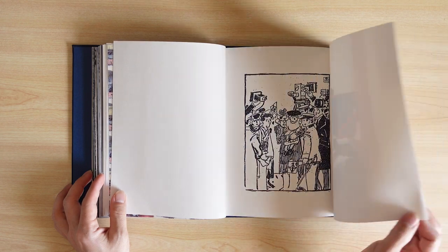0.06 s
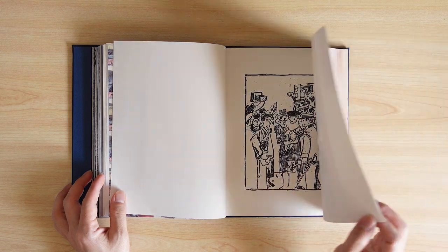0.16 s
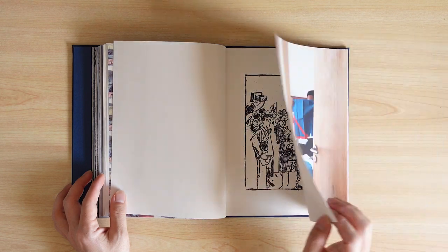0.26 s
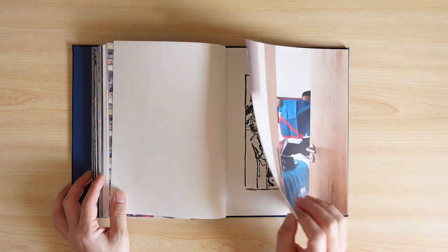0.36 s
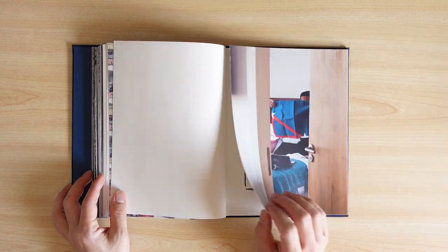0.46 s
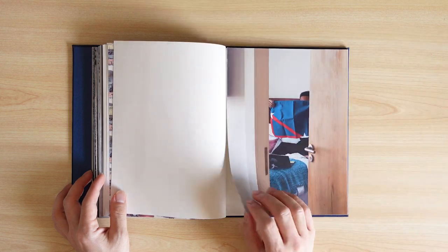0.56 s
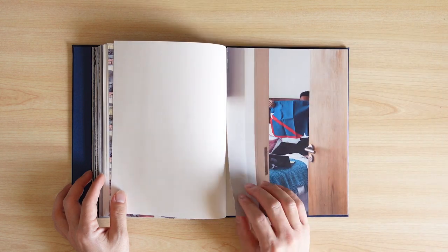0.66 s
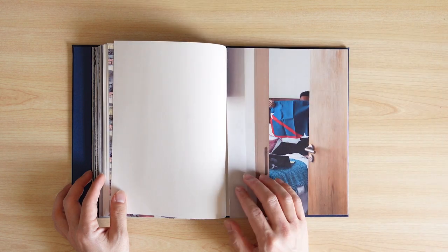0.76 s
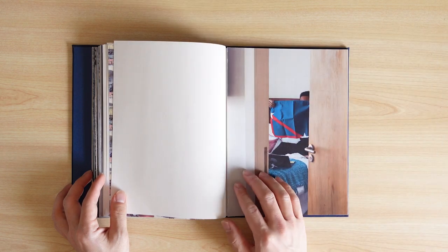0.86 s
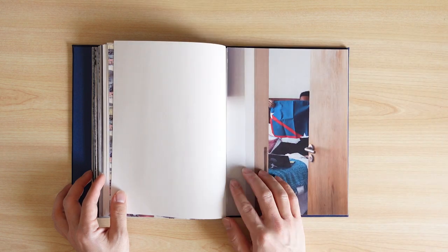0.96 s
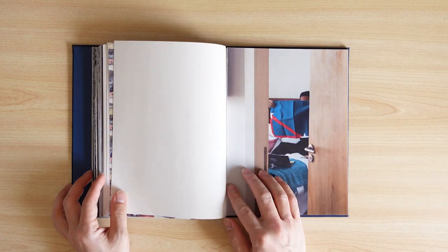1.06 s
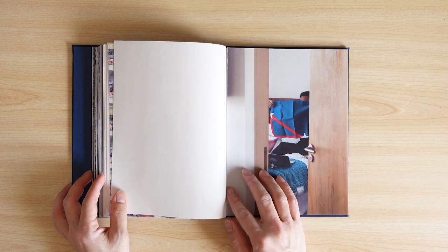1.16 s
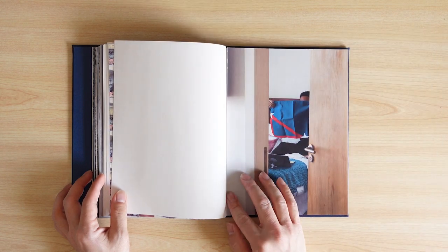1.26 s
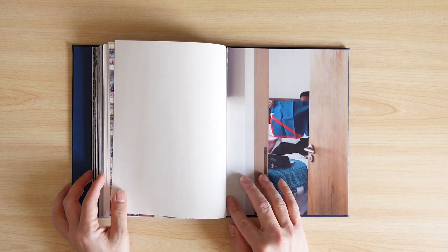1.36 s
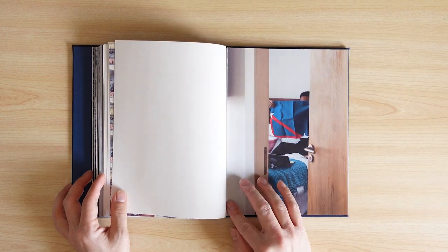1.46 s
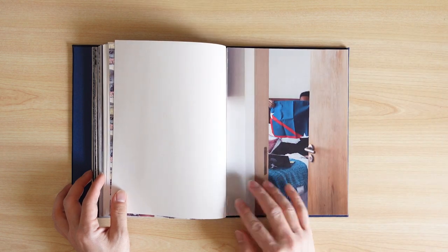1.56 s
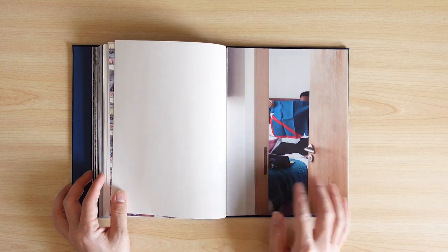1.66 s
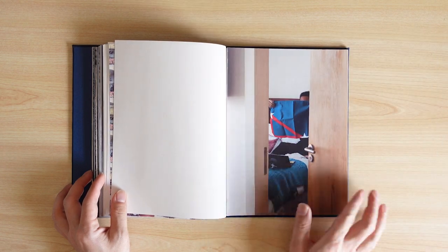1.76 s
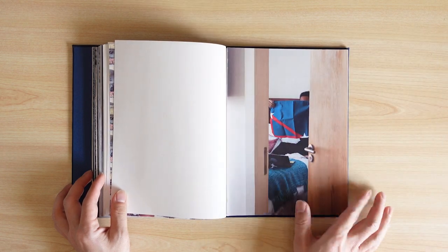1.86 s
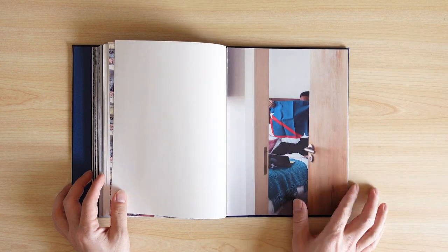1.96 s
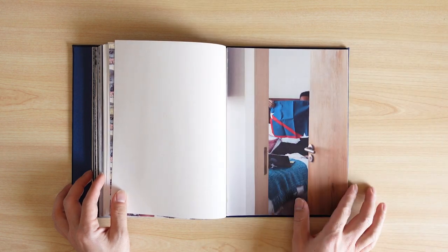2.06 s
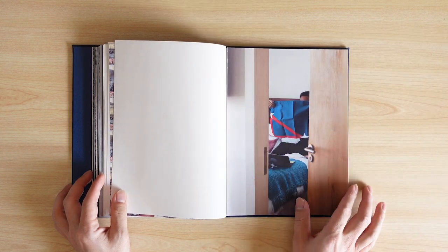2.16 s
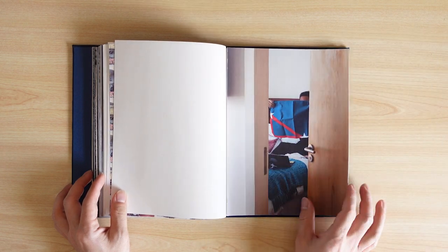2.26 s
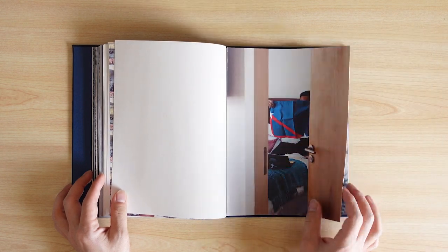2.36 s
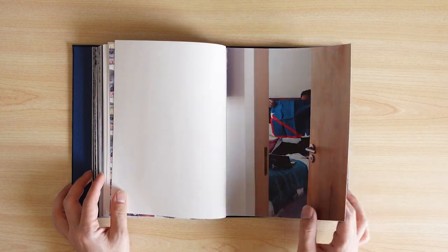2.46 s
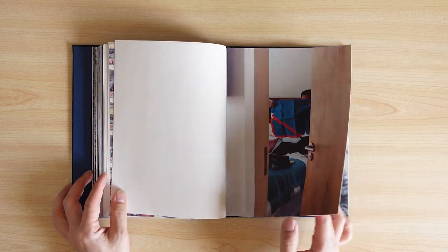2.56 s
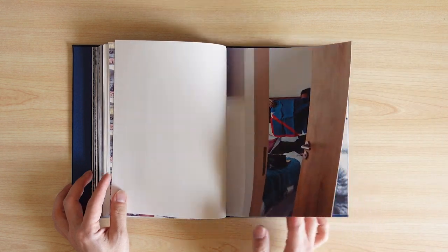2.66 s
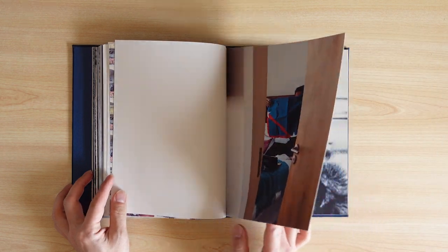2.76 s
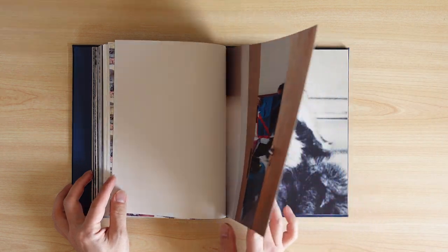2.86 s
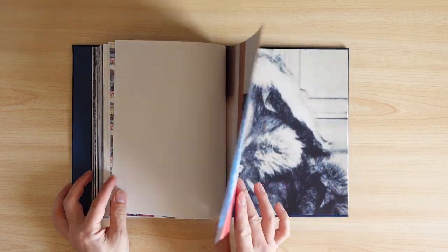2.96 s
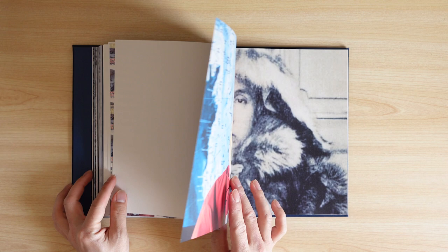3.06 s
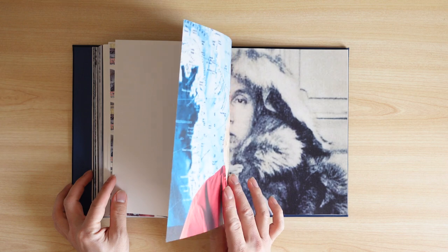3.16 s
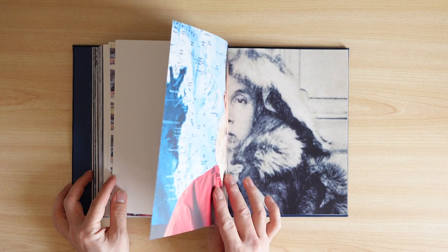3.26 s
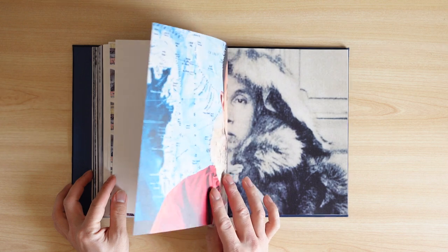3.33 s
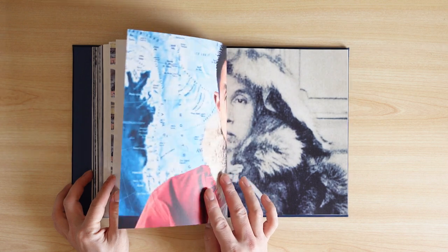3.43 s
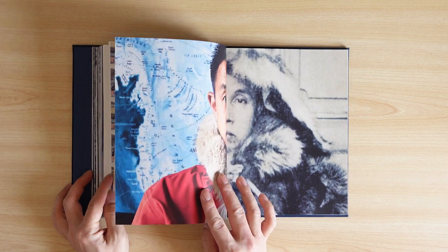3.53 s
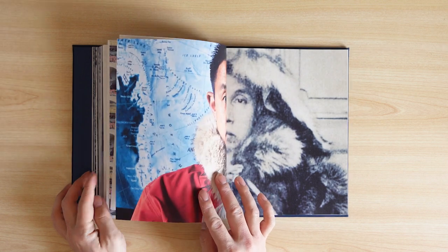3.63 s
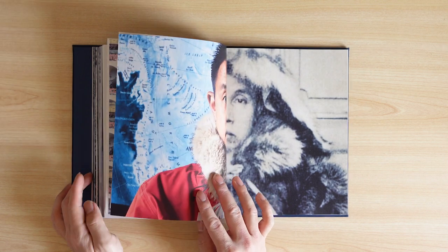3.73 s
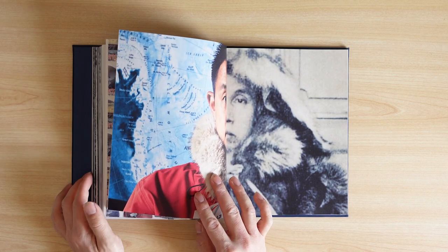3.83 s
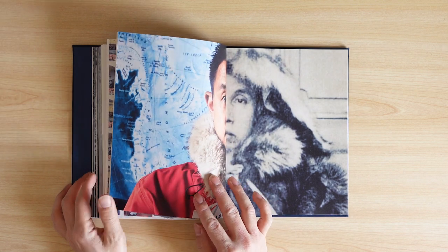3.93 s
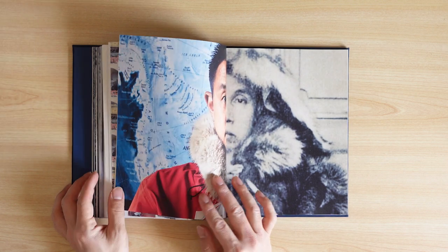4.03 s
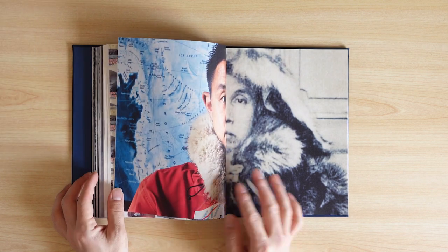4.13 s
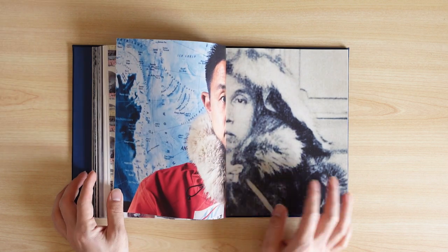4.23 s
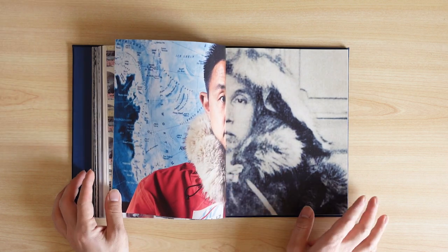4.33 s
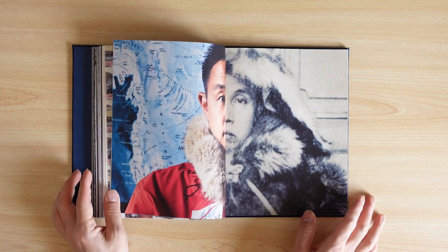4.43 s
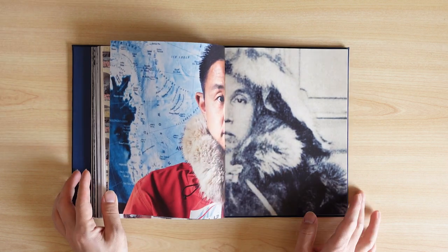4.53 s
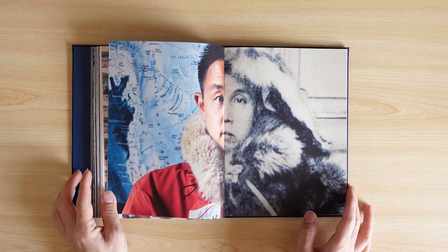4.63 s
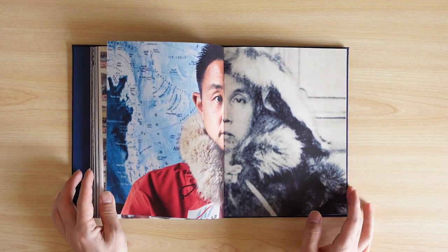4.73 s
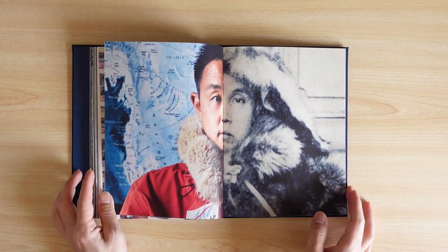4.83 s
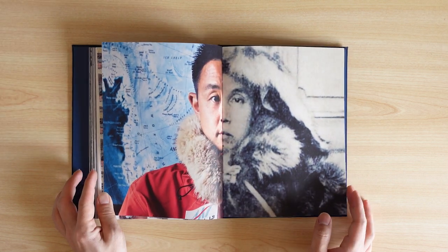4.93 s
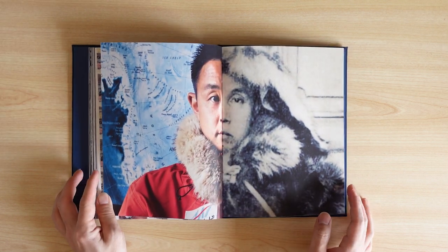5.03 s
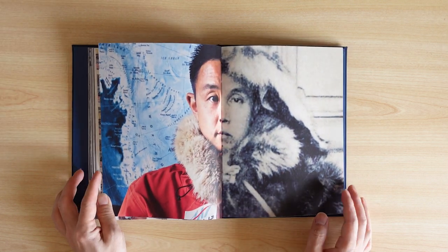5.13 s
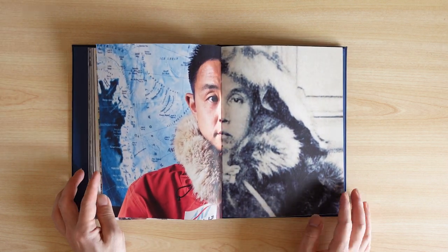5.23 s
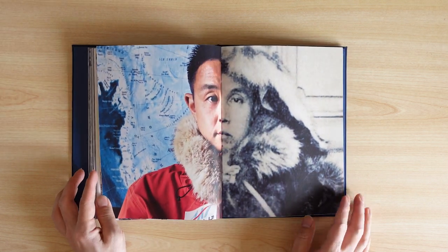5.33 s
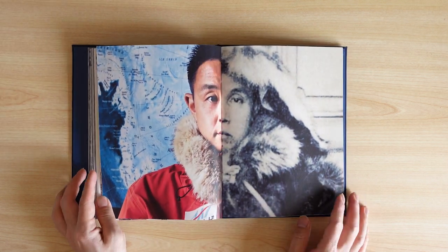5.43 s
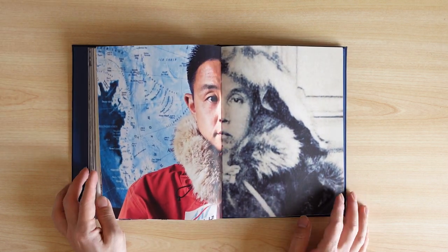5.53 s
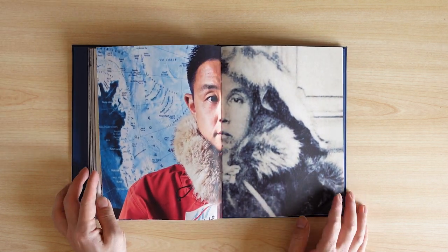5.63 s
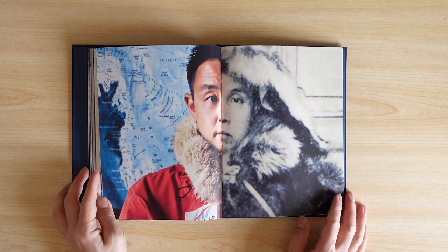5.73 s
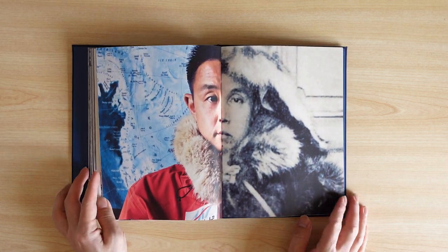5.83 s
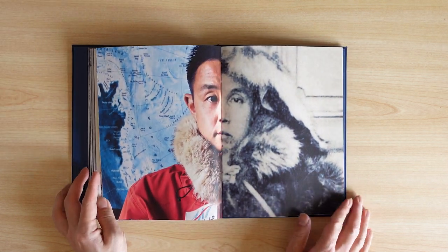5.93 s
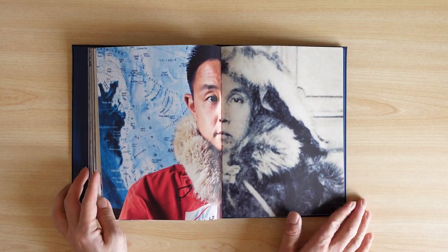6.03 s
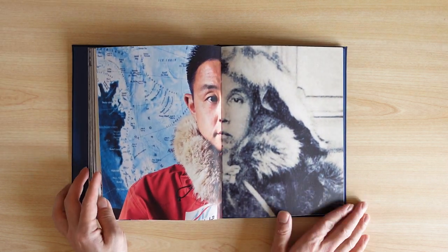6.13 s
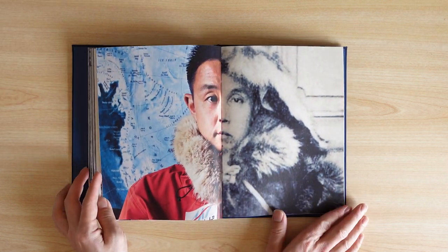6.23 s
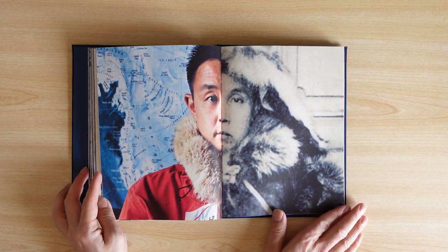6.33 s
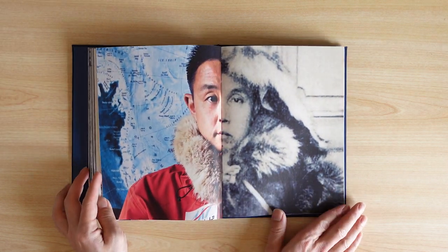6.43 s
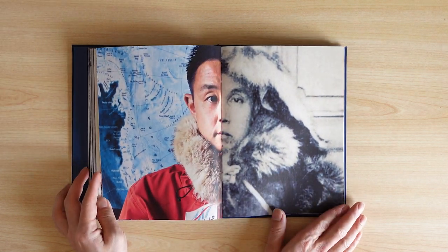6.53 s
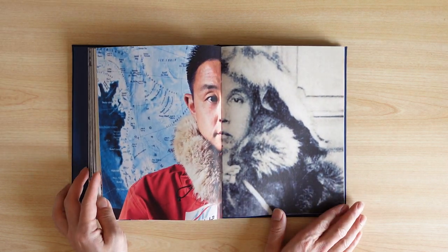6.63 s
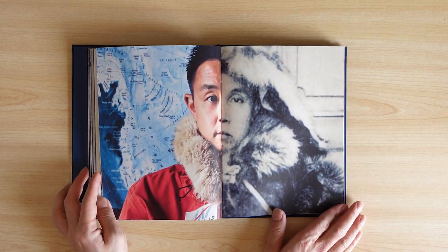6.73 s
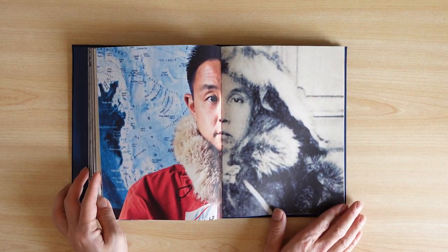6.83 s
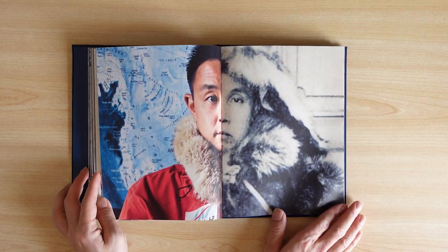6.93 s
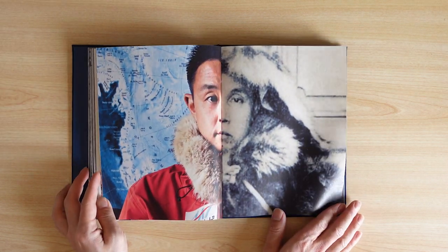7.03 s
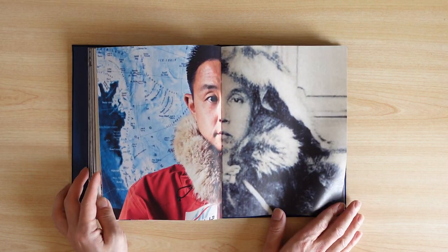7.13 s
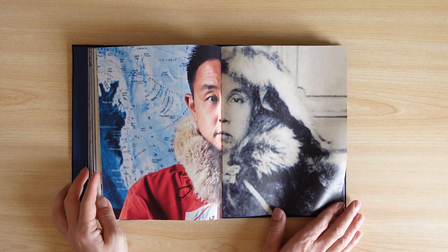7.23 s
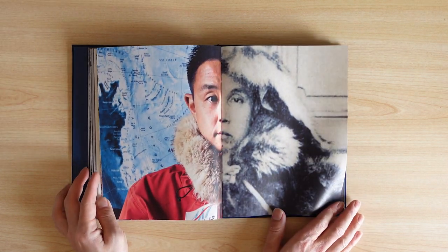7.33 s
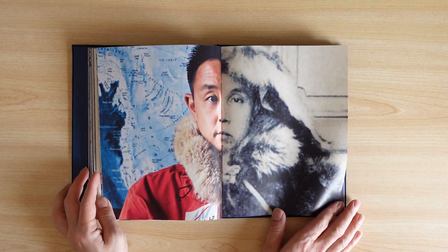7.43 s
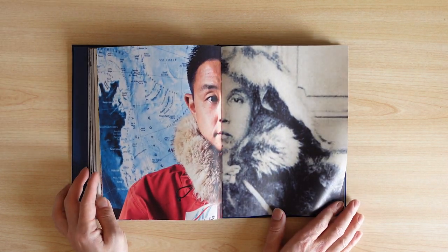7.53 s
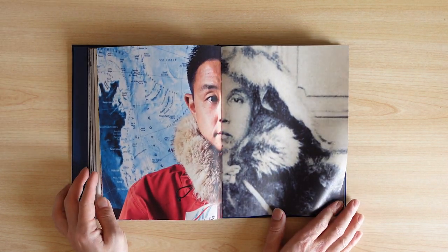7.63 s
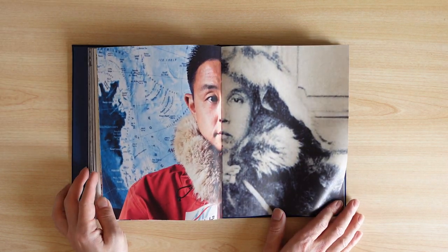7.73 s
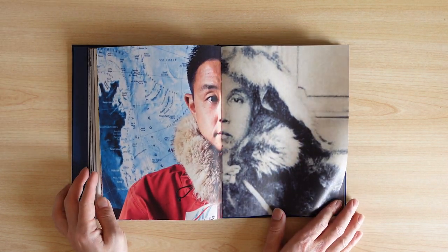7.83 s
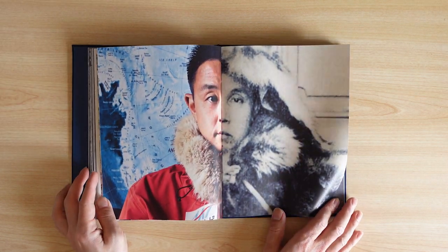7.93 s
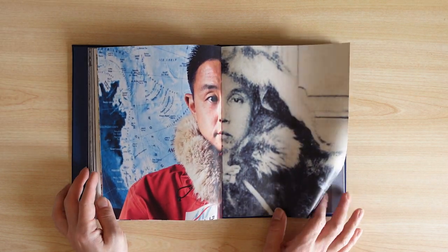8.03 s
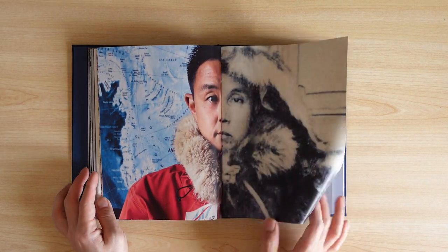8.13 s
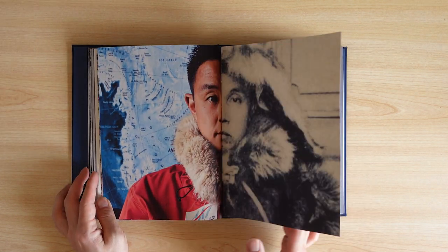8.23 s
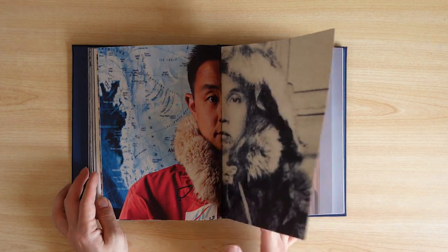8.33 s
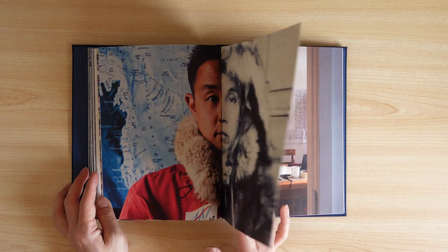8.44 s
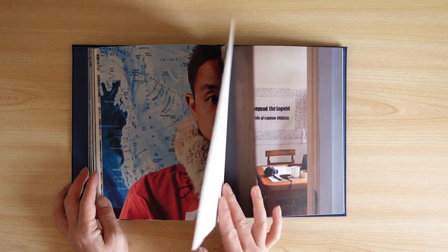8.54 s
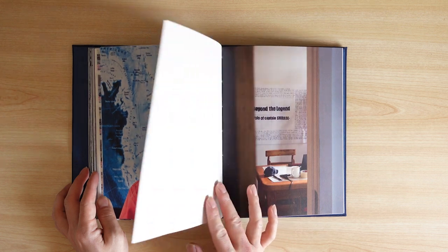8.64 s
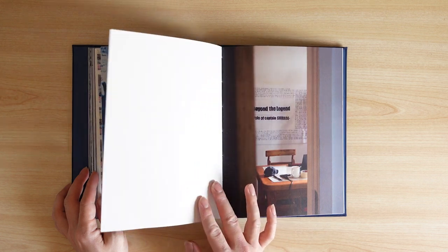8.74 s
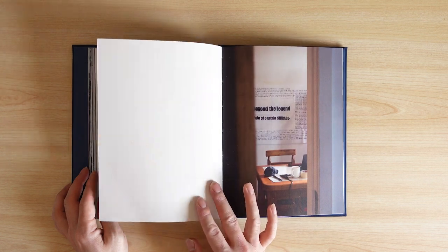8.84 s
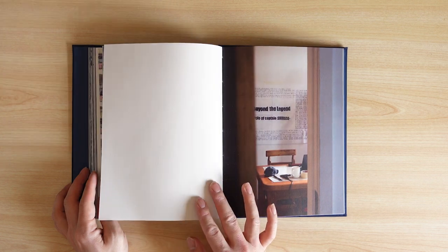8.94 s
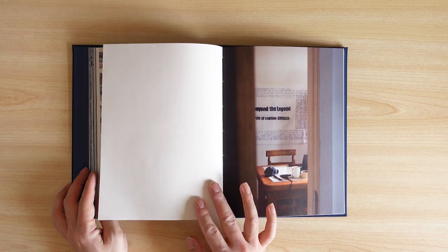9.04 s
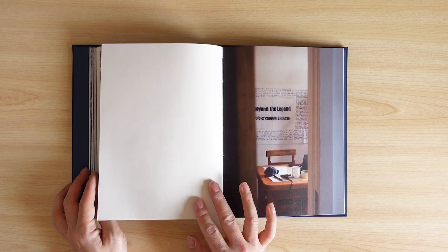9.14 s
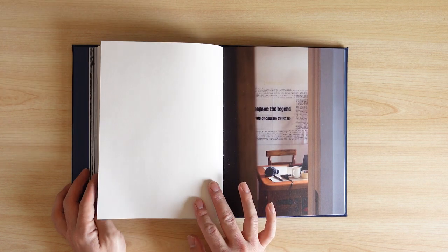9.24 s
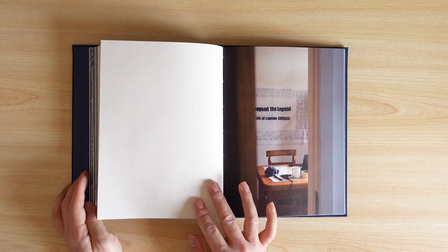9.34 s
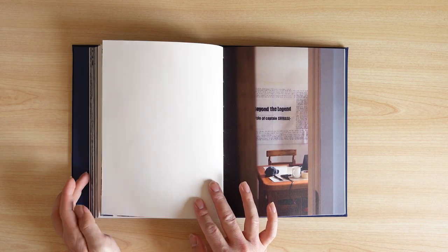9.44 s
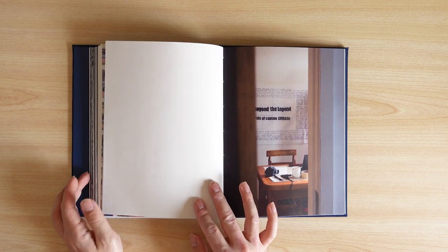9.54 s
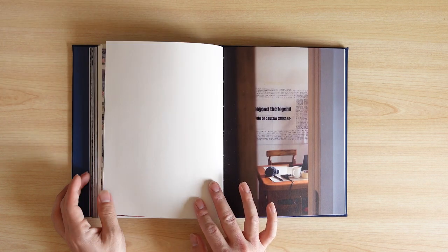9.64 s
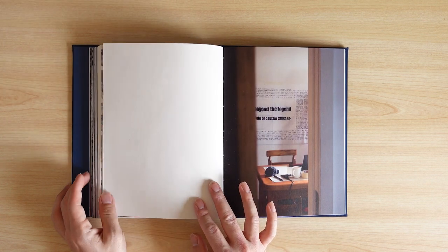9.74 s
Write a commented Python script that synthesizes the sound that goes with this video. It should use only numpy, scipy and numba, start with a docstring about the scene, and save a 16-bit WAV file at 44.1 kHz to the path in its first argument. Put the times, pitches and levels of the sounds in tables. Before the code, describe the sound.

Soft paper slides, ticks and light table knocks as a hardcover book is leafed through, with one loud page flap near the end.

```python
"""Turning the pages of a hardcover book

A quiet room, a book on a wooden table, a stereo pair of microphones close in front of it.
Skin and paper edges slide over stiff glossy sheets, whose fibres catch and let go in a hiss.
Small snaps tick, book and hands knock on the table, a fingertip creaks, and late on one page buckles
with a loud flap. A faint airy hum with one narrow whistle lies below."""
import sys
import numpy as np
from scipy import signal
from scipy.io import wavfile
from numba import njit

SR = 44100
rng = np.random.default_rng(int(sys.argv[2]) if len(sys.argv) > 2 else 0)


def unload_wav(signal):
    """Save mono or channel-first audio to the path in sys.argv[1] as 16-bit WAV at rate SR, clipped to [-1, 1]."""
    wavfile.write(
        sys.argv[1],
        SR,
        np.round(np.clip(np.atleast_2d(signal).T, -1, 1) * 32767).astype(np.int16),
    )


N = 431734

# spectrum of the room tone: frequency_hz, relative_density_db
AIR_SPECTRUM = [(18, -70), (30, -38), (161, -8.5), (499, -4), (540, -5.5), (801, -3), (988, -23.5),
                (1220, -2.5), (1590, -8), (4530, -17), (16000, -27)]
# how alike the room tone is at the two microphones: frequency_hz, correlation
AIR_LIKENESS = [(60, 0.49), (240, 0.1), (950, -0.15), (3770, -0.32), (15000, 0.67)]
# small snaps of paper: start_s, level_db, pitch_hz, crack_db (relative to level_db)
PAPER_SNAPS = [(0.038, -47.5, 1040, -9), (0.109, -48, 1120, 0), (0.133, -37.5, 950, -2),
               (0.387, -56, 1450, -5), (0.488, -54, 1490, -9), (0.704, -51, 1070, 0), (0.82, -57, 3600, 4),
               (1.05, -56, 1680, -23), (2.768, -50, 1060, 1), (2.831, -59.5, 1150, -25),
               (2.845, -60, 1150, 2), (3.015, -63, 1260, 9), (4.086, -52.5, 1410, -2),
               (4.407, -56, 1090, -4), (4.559, -55, 1470, -6), (4.787, -49.5, 1340, -16),
               (4.922, -51.5, 1470, -0.5), (5.251, -59, 1190, -4), (5.281, -42, 1090, -14),
               (5.49, -51, 1150, -15), (5.504, -45, 1040, -9), (5.618, -53.5, 950, -19),
               (5.681, -54, 1210, -1), (5.706, -60, 1210, -2), (5.753, -66, 1330, 7), (5.871, -54, 1030, 2),
               (6.659, -48.5, 1170, -18), (6.693, -50.5, 1160, -23), (6.785, -44.5, 1200, -7.5),
               (6.799, -47, 1130, -17), (6.821, -47, 1170, -18), (7.25, -59, 1980, 2),
               (7.622, -57.5, 1970, -18), (7.754, -56, 2020, -19), (7.85, -67, 1230, -1),
               (8.146, -41, 2100, 4), (8.226, -38, 2840, -6), (8.24, -42, 2480, 12), (9.469, -58, 1100, 3),
               (9.516, -57, 732, -3), (9.725, -61, 1240, 8)]
# strokes over the paper: full_strength_s, rise_s, hold_s, fall_s, friction_db,
# body_db, sheen_db, contact_db (these three relative to friction_db), contact_hz, body_hz
PAPER_STROKES = [ (0.11, 0.0043, 0.025, 0.033, -53.5, 3.5, -10, -3, 3520, 1130),
                 (0.135, 0.017, 0.022, 0.12, -48, -1, -10.5, -1, 3530, 1130),
                 (0.198, .05, .02, 0.11, -51.5, -3.5, -10.5, -10, 3500, 1450),
                 (0.281, 0.025, 0.025, 0.069, -50, -5, -12, -8, 3500, 1530),
                 (0.384, 0.0081, 0.052, 0.054, -55.5, -5, -18, -5.5, 2950, 1520),
                 (0.494, 0.02, 0.012, 0.11, -55.5, -7, -16, -6, 2920, 1490),
                 (0.71, 0.026, 0.015, 0.077, -52.5, -18, -24, -1, 3650, 1050),
                 (0.773, 0.065, 0.057, 0.025, -58.5, -20, -8, 1, 3660, 1050),
                 (0.894, 0.15, 0.061, 0.18, -73.5, -9, -1, -7, 3630, 1210),
                 (1.048, .025, 0.018, 0.064, -70, 4.5, -2, -5, 2800, 1210),
                 (1.269, 0.19, 0.06, .2, -60, -9.5, -4, -14, 4900, 1380),
                 (1.418, .15, .08, 0.17, -60, -10, -5.5, -10, 4200, 1380),
                 (1.655, .1, 0.032, 0.24, -74, 1, 1.5, -11, 3600, 1200),
                 (2.346, 0.14, .02, 0.051, -70, -20, 5.5, -11, 4900, 1120),
                 (2.439, 0.036, 0.012, 0.19, -53, -4, -6, -7, 3080, 995),
                 (2.664, .12, .05, .1, -57, -3.5, -2.5, -8, 3540, 890),
                 (2.751, 0.093, 0.0097, .12, -53, 2, -4, -6.5, 3060, 1070),
                 (2.873, 0.32, 0.1, 0.19, -66.5, -5.5, 4.5, -13, 2900, 1170),
                 (3.124, 0.26, 0.27, .2, -75.5, -5, -3, 0, 4580, 1000),
                 (3.519, .05, 0.016, 0.22, -59, -0.5, -8, -9, 4320, 1230),
                 (3.632, 0.077, 0.051, 0.087, -57.5, -9.5, -24, -10, 4560, 1270),
                 (3.791, .15, 0.078, 0.065, -51, -6, -15, -5.5, 4400, 950),
                 (3.94, .1, 0.051, 0.13, -66.5, -2, -11, -1.5, 4200, 1170),
                 (4.081, 0.017, 0.008, 0.16, -61, -2, -11, -2.5, 4040, 1260),
                 (4.24, .06, 0.016, 0.18, -69.5, 0, -8, -7, 4100, 1210),
                 (4.403, 0.013, 0.013, 0.16, -66.5, 1, -9, -7, 4470, 1180),
                 (4.574, 0.12, 0.092, .3, -73.5, 8.5, 2, -1, 4270, 1220),
                 (4.916, .015, 0.0074, 0.12, -67, 6, -2.5, -12, 3270, 1240),
                 (5.105, 0.23, 0.073, 0.2, -79, 12, -12, -13, 3380, 1110),
                 (5.301, 0.033, 0.058, 0.083, -51, -1.5, -14.5, -5, 4400, 1120),
                 (5.508, 0.023, 0.0095, 0.085, -61.5, 4.5, -11, -3, 4300, 1230),
                 (5.681, 0.0072, 0.016, 0.045, -64, 1.5, -19, -2, 4600, 1220),
                 (5.759, 0.025, 0.025, 0.062, -68.5, 2.5, -12, -4, 4230, 1210),
                 (5.871, 0.0083, 0.0046, 0.037, -63.5, -5, -8, -7, 4300, 1140),
                 (6.26, 0.064, .02, 0.12, -79, -4.5, 4, -8, 3960, 1160),
                 (6.532, .12, 0.092, 0.12, -79.5, 1, -23, -6, 2800, 1140),
                 (6.784, 0.012, 0.031, .06, -73.5, 1, -6, -5, 2900, 1160),
                 (7.046, 0.048, 0.031, 0.072, -57, -9.5, -10.5, -7, 3800, 1210),
                 (7.132, 0.071, 0.023, 0.088, -62.5, -9, -8, -1.5, 2800, 1240),
                 (7.312, 0.14, 0.028, .08, -69.5, -6, -18, 3, 2630, 1210),
                 (7.453, .05, .01, 0.064, -72, 1, -15, -6, 2860, 1200),
                 (7.554, 0.027, 0.015, 0.053, -71, 3, -25, -1.5, 2880, 1230),
                 (7.627, 0.023, 0.015, .1, -70.5, 1, -19, -3, 2880, 1300),
                 (7.755, 0.02, 0.0079, 0.037, -63.5, -4, -12, -4, 2880, 1260),
                 (7.846, 0.019, 0.022, .15, -67.5, -2.5, -25, -3, 2850, 1290),
                 (7.977, 0.058, 0.045, .1, -53.5, -11, -10.5, -12, 2800, 1950),
                 (8.069, 0.088, 0.095, 0.078, -49, -8.5, -0.5, -8, 3900, 1960),
                 (8.233, 0.024, 0.014, 0.018, -37, -6, 0, -3, 3200, 1890),
                 (8.251, 0.01, 0.024, 0.054, -39.5, 10, -5, -5.5, 2860, 1090),
                 (8.319, .05, 0.046, 0.19, -52, -12, 3.5, -11, 3500, 834),
                 (8.494, 0.092, 0.028, 0.086, -53.5, -11, 0, -11, 5740, 895),
                 (8.604, .1, 0.017, 0.2, -59.5, -3, -5, -10, 5800, 990),
                 (8.913, 0.062, 0.03, 0.16, -71.5, 5, -4, -8, 4300, 960),
                 (9.195, .06, .04, 0.12, -69.5, -12, -6, -7, 4360, 1070),
                 (9.293, 0.16, 0.18, 0.034, -65, -22, 1.5, -8, 3000, 1090),
                 (9.48, 0.072, .03, 0.19, -69, 1, -4, -3, 4270, 1020),
                 (9.726, .015, 0.084, 0.042, -73, -12.5, -9, -2, 4750, 1170)]
# narrow, roughly evenly spaced peaks that colour the rubbing hiss: pitch_hz, level_db
RUB_PEAKS = [(2050, -5), (2800, -6), (3650, -10), (4500, -8), (5200, -9), (5800, -8), (6850, -9),
             (8100, -12), (9300, -12)]
# where the hands are between the microphones: time_s, left_minus_right_db
HAND_PAN = [(0.0, -2), (0.98, 1), (2.04, -1), (2.21, -1.5), (3.6, 1), (5.83, 1), (7.17, -2), (7.58, 0.0),
            (7.74, -2), (8.53, 0), (9.13, 1.5), (9.79, 1.0)]
# book and hands against the table: start_s, level_db, pitch_hz, t60_s
TABLE_KNOCKS = [(2.158, -70.5, 140.4, 0.69), (4.469, -67.5, 144, 0.4), (4.699, -65, 132, 0.32),
                (4.922, -60, 420, 0.17), (5.348, -62, 353, 0.22), (5.868, -63, 169, 0.097),
                (5.902, -57.5, 217, 0.058), (8.265, -61, 136, 0.53), (8.395, -41.5, 319.5, 0.14),
                (8.917, -48, 344.5, 0.09), (9.496, -60.5, 340, 0.14)]
# one fingertip creak: start_s, end_s, level_db, pitch_hz, upper_hz, upper_db (relative to level_db)
FINGER_CREAK = (6.465, 6.62, -54.5, 1190, 2800, -12)
# buckles running through the lifted page: full_strength_s, rise_s, hold_s, fall_s, strike_db,
# upper_modes_db (relative to strike_db)
PAGE_BUCKLES = [(8.2485, .002, .001, .015, -24, 7), (8.272, .045, .017, .03, -21.5, 3),
                (8.322, .012, .008, .024, -32, -8), (8.373, .004, .032, .065, -36.5, -15)]
# modes of the lifted page: pitch_hz, level_db, t60_s (capped at PAGE_MAX_T60_S)
PAGE_MODES = [(402, -18, 0.067), (540, -11, 0.052), (660, -10, 0.072), (722, -1, 0.11), (960, -12.5, 0.036),
              (1033, -8.5, 0.07), (1107, -5.5, 0.081), (1240, -3.5, 0.03), (1344, -5.5, 0.036),
              (1500, -11.5, .03), (1810, -6, 0.023), (2010, -7, 0.014), (2360, -18, 0.023),
              (2649, -14.5, 0.024)]

AIR_DB, WHISTLE_DB, WHISTLE_HZ, WHISTLE_WIDTH_HZ = -65.5, -72.5, 1212, 40
SWING_DB = 20   # gained over a rise time, lost over a fall time
SHEEN_DULL_HZ, FRICTION_SIDE_DB = 9000, -9.5
SLIPS_PER_S, SLIP_SPREAD_DB, SLIP_T60_S = 95, 2.5, .04
RIPPLE_GAP_S, RIPPLE_DB, RIPPLE_SPREAD_DB = .005, -3.5, 2
PAGE_MAX_T60_S, PAGE_BASS_CUT_HZ = .06, 260
ROOM_T60_S, WALL_CUT_HZ, ROOM_DB, ROOM_WIDTH_DB = .4, 6000, -23, -7
TOP_CUT_HZ = 16100


def from_db(db):
    """Decibels to gain."""
    return 10 ** (np.asarray(db) / 20)


def rms_one(x):
    """Scale to rms 1."""
    return x / np.sqrt(np.mean(x ** 2) + 1e-20)


def as_side(x):
    """Opposite polarity on the left and right channels."""
    return x * [[1], [-1]]


def at_hz(points, hz):
    """Read a spectrum on a log-frequency axis."""
    frequencies, values = np.transpose(points)
    return np.interp(np.log(hz), np.log(frequencies), values)


def band(x, low_hz, high_hz):
    """Butterworth band-pass."""
    return signal.sosfilt(signal.butter(2, [low_hz, min(high_hz, SR / 2.1)], "band", fs=SR, output="sos"), x)


def drift(rate_hz):
    """Slow random wander of rms about 1."""
    step, settle = 40, 2000
    r = np.exp(-2 * np.pi * rate_hz * step / SR)
    slow = signal.lfilter([1], [1, -2 * r, r * r], rng.standard_normal(N // step + settle + 2))[settle:]
    return np.interp(np.arange(N) / step, np.arange(len(slow)), rms_one(slow))


def resonance(x, hz, width_hz):
    """Two-pole resonance, scaled to rms 1."""
    r, w = np.exp(-np.pi * width_hz / SR), 2 * np.pi * hz / SR
    return rms_one(signal.lfilter([1, 0, -1], [1, -2 * r * np.cos(w), r * r], x))


@njit
def glide(x, hz, width_hz):
    """Resonance whose centre moves sample by sample, scaled to rms 1."""
    r, cos_w = np.exp(-np.pi * width_hz / SR), np.cos(2 * np.pi * hz / SR)
    y = np.zeros(len(x))
    for i in range(2, len(x)):
        y[i] = x[i] - x[i - 2] + 2 * r * cos_w[i] * y[i - 1] - r * r * y[i - 2]
    return y / np.sqrt(np.mean(y ** 2))


def ring(clicks, hz, t60):
    """A unit click sets a sine of height 1 ringing."""
    r, w = 1000 ** (-1 / (t60 * SR)), 2 * np.pi * hz / SR
    return signal.lfilter([0, np.sin(w)], [1, -2 * r * np.cos(w), r * r], clicks + 1e-18)


def decay(t, t60):
    """Gain that falls 60 dB in t60 seconds."""
    return from_db(-60 * t / t60)


def swell_db(t, full_s, rise, hold, fall):
    """Rise, hold and fall in dB, 0 on top."""
    return -SWING_DB * np.maximum(0, np.maximum((full_s - t) / rise, (t - full_s - hold) / fall))


def add(out, sound, start_s):
    """Mix a short sound in at a time."""
    at = round(start_s * SR)
    out[at:at + len(sound)] += sound[:N - at]


def room_tone():
    """An airy hum of half-octave noise bands, each wavering by itself, and one narrow whistle."""
    hum, edges_hz = 0, 30 * 2 ** np.arange(0, 9.3, .5)
    white = rng.standard_normal((2, 2, N))   # neighbouring bands get unrelated noise
    for k, (low, high) in enumerate(zip(edges_hz, edges_hz[1:])):
        mid, side = band(white[k % 2], low, high)
        hz = np.sqrt(low * high)
        alike = at_hz(AIR_LIKENESS, hz)
        gain = from_db(at_hz(AIR_SPECTRUM, hz) + 1.44 * drift(0.71))
        hum += gain * (np.sqrt(1 + alike) * mid + np.sqrt(1 - alike) * as_side(side))
    whistle = resonance(rng.standard_normal((2, N)), WHISTLE_HZ, WHISTLE_WIDTH_HZ)
    return from_db(AIR_DB) * rms_one(hum) + from_db(WHISTLE_DB + 0.5 * drift(1.9)) * whistle


def paper_snaps():
    """Each snap is a short ring of the sheet, a fading puff of noise and a sharp, bright crack."""
    out, t = np.zeros(N), np.arange(2000) / SR
    for start_s, db, hz, crack_db in PAPER_SNAPS:
        noise = rng.standard_normal(len(t))
        tone = np.sin(2 * np.pi * hz * t) * decay(t, 0.023)
        puff = from_db(-2) * band(noise, 430, 2100) * decay(t, 0.082)
        crack = band(noise, 2200, 11000) * (decay(t, .007) + from_db(-11) * decay(t, .035))
        add(out, from_db(db) * (tone + puff + from_db(crack_db) * crack), start_s)
    return out


def hand_strokes():
    """Gains and pitches of the rubbing: strokes add in power, and the strongest pulls the pitch most."""
    t = np.arange(0, N + 32, 32) / SR
    db, body_db, sheen_db, contact_db, contact_hz, body_hz = np.transpose(PAPER_STROKES)[4:]
    stroke_db = db + np.transpose([swell_db(t, *row[:4]) for row in PAPER_STROKES])
    powers = [from_db(stroke_db + offset) ** 2 + 1e-30 for offset in (0, body_db, sheen_db, contact_db)]
    gains = [np.sqrt(power.sum(axis=1)) for power in powers]
    _, body, _, contact = powers
    pitches = [contact @ contact_hz / contact.sum(axis=1), body @ body_hz / body.sum(axis=1)]
    return [np.interp(np.arange(N) / SR, t, curve) for curve in gains + pitches]


def friction(per_s, spread_db):
    """Fibres catch and let go: dense clicks of uneven size, coming in clumps."""
    sizes = from_db(spread_db * np.minimum(rng.exponential(1, N), 5)) * rng.choice([-1, 1], N)
    caught = rng.random(N) < per_s * from_db(3 * drift(40)) / SR
    return rms_one(sizes * caught)


def rub_peaks(catches, contact_hz):
    """Narrow peaks colour the rubbing hiss, each swelling and fading, favoured near contact_hz."""
    out = 0
    for k, (hz, db) in enumerate(RUB_PEAKS):
        near_db = -6 * np.abs(np.log2(hz / contact_hz))
        out += (-1) ** k * from_db(db + near_db + 3 * drift(3)) * resonance(catches, hz, width_hz=170)
    return out


def sheet_body(body_hz):
    """The flexing sheet sounds low: one narrow resonance in a broad band of friction."""
    tone = glide(friction(5000, spread_db=3.5), body_hz, width_hz=110)
    rustle = band(band(friction(5000, spread_db=3), 600, 2600), 600, 2600)
    return from_db(-4) * (rms_one(rustle) + tone)


def edge_sheen():
    """Bright friction of the long page edge, which reaches the two microphones unalike."""
    edge = band(friction(5000, spread_db=3), 6500, 20000)
    edge = rms_one(signal.sosfilt(signal.butter(1, SHEEN_DULL_HZ, fs=SR, output="sos"), edge))
    side = as_side(rms_one(band(rng.standard_normal(N), 4400, 18000)))
    return from_db(2 * drift(3.7)) * (edge + from_db(-11.5) * side)


def paper_rubbing():
    """Friction makes a peaky hiss, a contact resonance, the sheet's low body and its bright edge."""
    slide_gain, body_gain, sheen_gain, contact_gain, contact_hz, body_hz = hand_strokes()
    catches = friction(9000, spread_db=0)
    contact = glide(friction(9000, spread_db=3.2), contact_hz, width_hz=300)
    hiss = band(glide(friction(9000, spread_db=4.5), contact_hz, width_hz=3000), 1370, 5760)
    side = as_side(rms_one(band(rng.standard_normal(N), 1500, 6300)))
    slide = rub_peaks(catches, contact_hz) + from_db(-6) * hiss + from_db(FRICTION_SIDE_DB) * side
    body = sheet_body(body_hz)
    return slide_gain * slide + contact_gain * contact + body_gain * body + sheen_gain * edge_sheen()


def table_knocks():
    """Soft blows on wood: a low ring that swells for some milliseconds, with a dull rumble around it."""
    out, t = np.zeros(N), np.arange(14000) / SR
    attack = (1 - np.exp(-t / 0.0028)) ** 2
    for start_s, db, hz, t60 in TABLE_KNOCKS:
        edges_hz = hz / 1.76, hz * 2.5
        rumble = rms_one(band(band(rng.standard_normal(len(t)), *edges_hz), *edges_hz))
        wood = np.sin(2 * np.pi * hz * t) + from_db(1) * rumble
        add(out, from_db(db) * attack * decay(t, t60) * wood, start_s)
    return out


def finger_creak():
    """A fingertip sticks and slips unevenly, each slip ringing briefly at two pitches."""
    start_s, end_s, db, hz, upper_hz, upper_db = FINGER_CREAK
    gap_jitter, level_jitter = rng.standard_normal((30, 2)).T
    slip_s = start_s + np.cumsum(from_db(2.1 * gap_jitter)) / SLIPS_PER_S
    slips = np.zeros(N)
    slips[(slip_s * SR).astype(int)] = from_db(db + SLIP_SPREAD_DB * level_jitter) * (slip_s < end_s)
    return ring(slips, hz, SLIP_T60_S) + from_db(upper_db) * ring(slips, upper_hz, SLIP_T60_S / 2)


def buckles():
    """Smaller buckles crowd unevenly round each main one; gives time_s, strike_db, upper_modes_db."""
    steps, groups = np.arange(-8, 17), []
    is_ripple = steps != 0
    for full_s, rise, hold, fall, db, upper_db in PAGE_BUCKLES:
        time_jitter, level_jitter = rng.standard_normal((2, len(steps)))
        time_s = full_s + RIPPLE_GAP_S * (steps + .25 * np.clip(time_jitter, -1.8, 1.8) * is_ripple)
        ripple_db = (RIPPLE_DB + RIPPLE_SPREAD_DB * level_jitter) * is_ripple
        strike_db = db + swell_db(time_s, full_s, rise, hold, fall) + ripple_db
        groups.append([time_s, strike_db, np.full(len(steps), upper_db)])
    return np.hstack(groups)


def page_flap():
    """Each buckle strikes every mode of the lifted page with its own strength, sign and slight delay."""
    time_s, strike_db, upper_db = buckles()
    at, out = np.round(time_s * SR).astype(int), np.zeros(N)
    jitter = rng.standard_normal((len(time_s), len(PAGE_MODES), 3))
    for k, (hz, mode_db, t60) in enumerate(PAGE_MODES):
        level_jitter, polarity, time_jitter = jitter[:, k].T
        delay = (np.abs(time_jitter) * .002 * SR).astype(int)
        db = strike_db + mode_db + upper_db * (hz > 1450) + 1.3 * level_jitter
        strikes = np.zeros(N)
        np.add.at(strikes, at + delay, from_db(db) * np.sign(polarity))
        out += ring(strikes, hz, min(t60, PAGE_MAX_T60_S))
    return band(out, 88, 3800)


def room_echoes(x):
    """Wall reflections: eight feedback delays a side, duller on every round, narrowed in stereo."""
    out, dull = np.zeros((2, N)), np.exp(-2 * np.pi * WALL_CUT_HZ / SR)
    lags = (rng.uniform(0.0074, .035, size=16) * SR).astype(int)
    for k, lag in enumerate(lags):
        loop, gain, state = x.copy(), decay(lag / SR, ROOM_T60_S), [0.]
        for i in range(lag, N, lag):
            back, state = signal.lfilter([gain * (1 - dull)], [1, -dull], loop[i - lag:i], zi=state)
            loop[i:i + lag] += back[:N - i]
        out[k % 2] += (loop - x) * (-1) ** (k // 2)
    left, right = out
    return left + right + from_db(ROOM_WIDTH_DB) * as_side(left - right)


def scene():
    """The book close to the microphones, shifting a little with the hands, and the room behind it."""
    rubbing = paper_rubbing()
    # a thin page radiates no bass
    bass_cut = signal.butter(4, PAGE_BASS_CUT_HZ, "high", fs=SR, output="sos")
    crackle = signal.sosfilt(bass_cut, paper_snaps() + page_flap() + finger_creak())
    book = rubbing + crackle + table_knocks()
    pan_db = np.interp(np.arange(N) / SR, *np.transpose(HAND_PAN))
    direct = book * from_db([pan_db / 2, -pan_db / 2])
    return direct + from_db(ROOM_DB) * room_echoes(book.mean(axis=0)) + room_tone()


def record(dry):
    """A steep low-pass takes off the highest treble."""
    return signal.sosfilt(signal.cheby2(20, 70, TOP_CUT_HZ, fs=SR, output="sos"), dry)


dry = scene()
out = record(dry)
unload_wav(out)
```